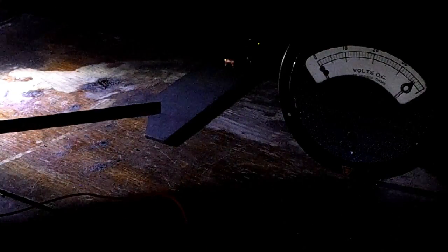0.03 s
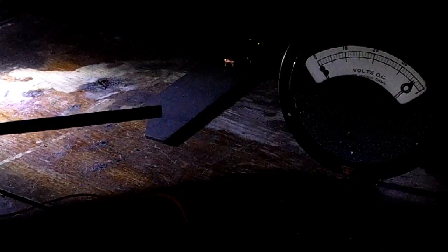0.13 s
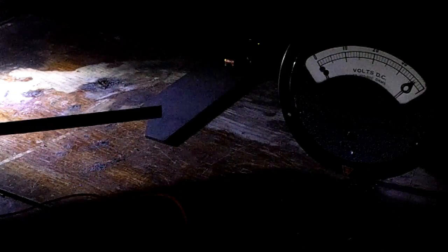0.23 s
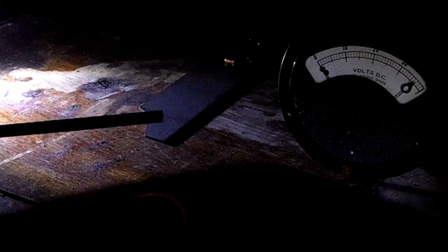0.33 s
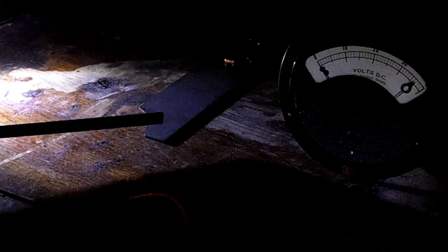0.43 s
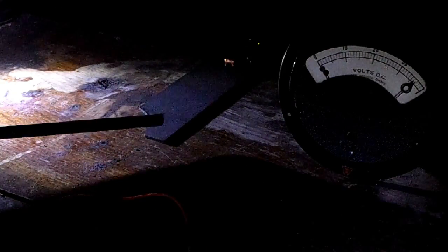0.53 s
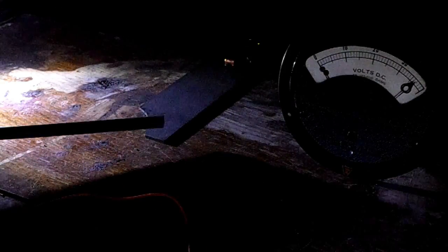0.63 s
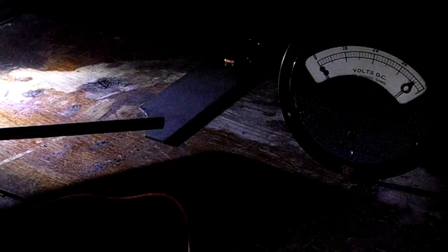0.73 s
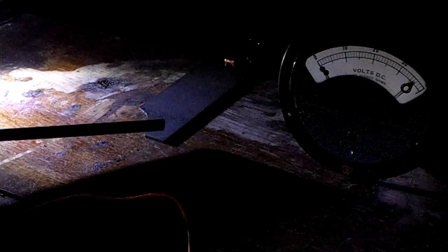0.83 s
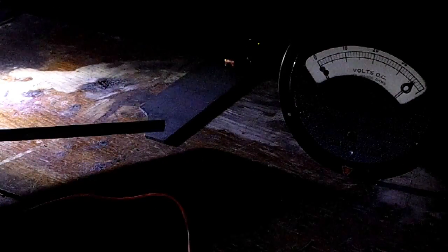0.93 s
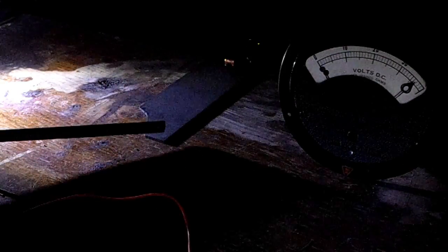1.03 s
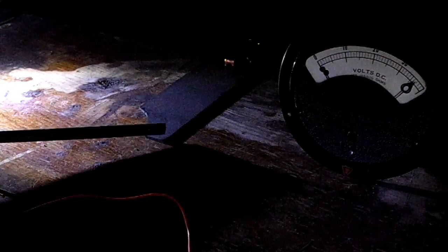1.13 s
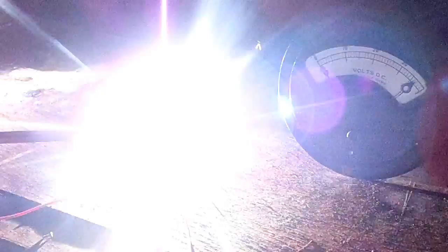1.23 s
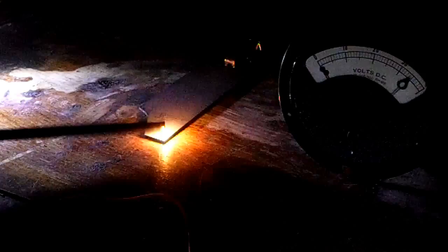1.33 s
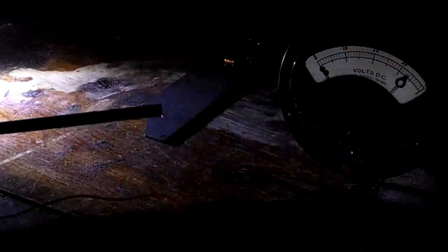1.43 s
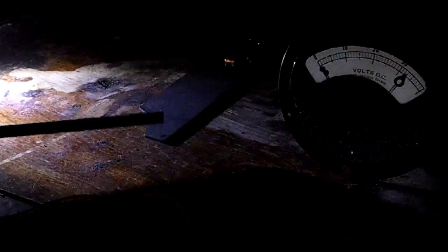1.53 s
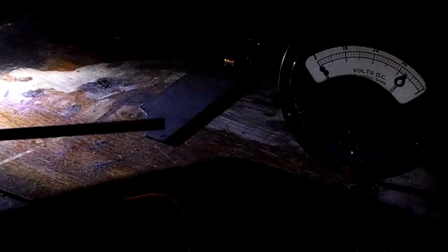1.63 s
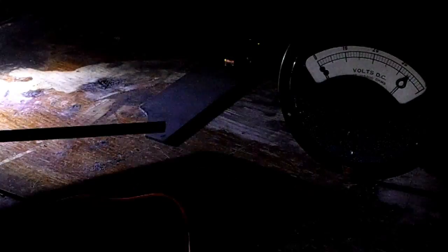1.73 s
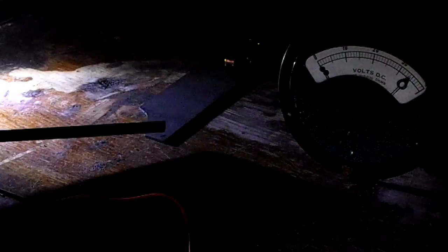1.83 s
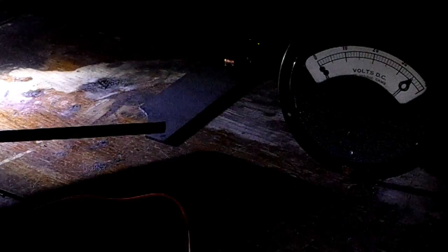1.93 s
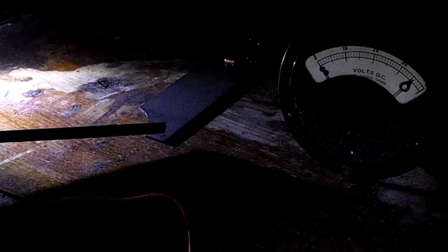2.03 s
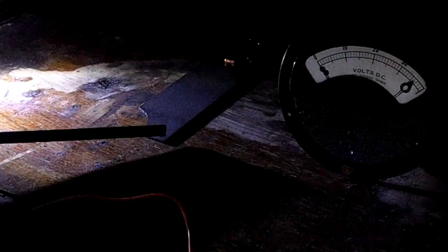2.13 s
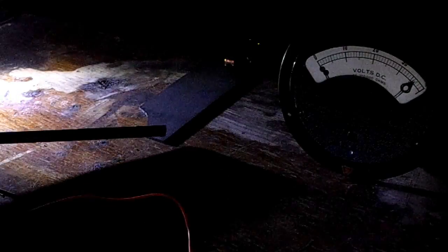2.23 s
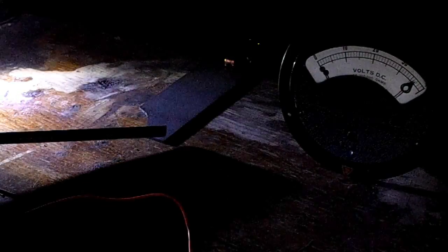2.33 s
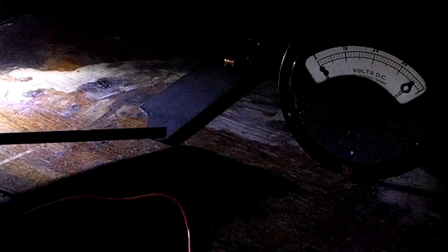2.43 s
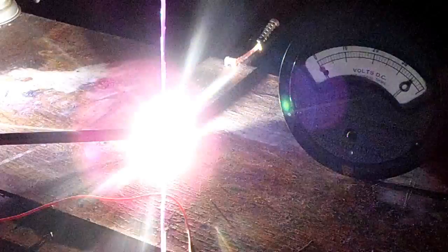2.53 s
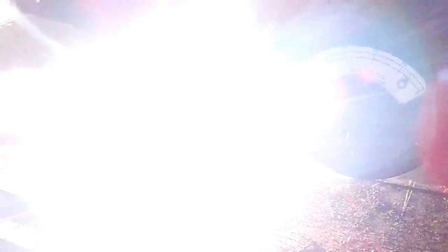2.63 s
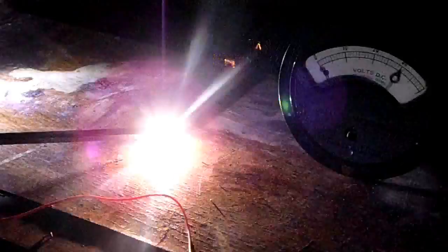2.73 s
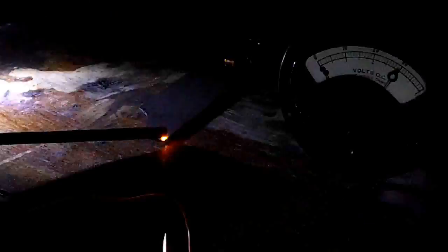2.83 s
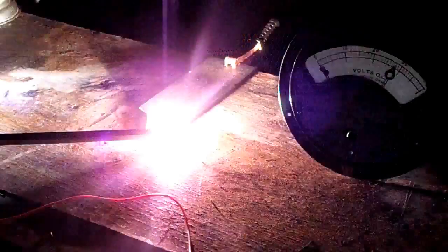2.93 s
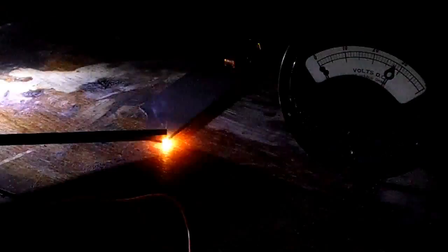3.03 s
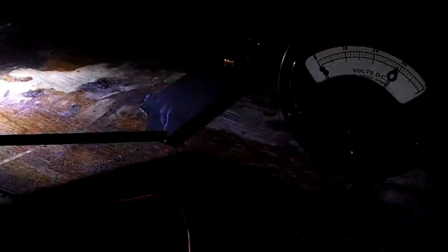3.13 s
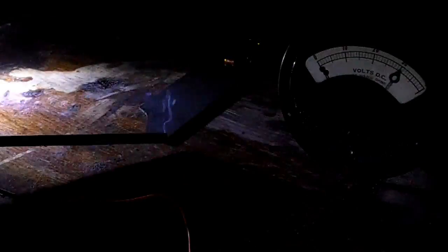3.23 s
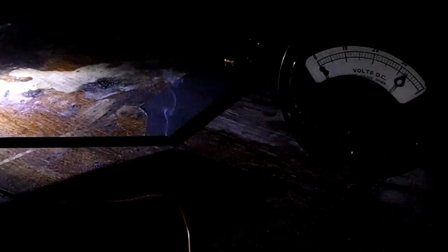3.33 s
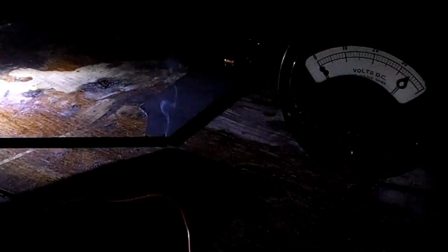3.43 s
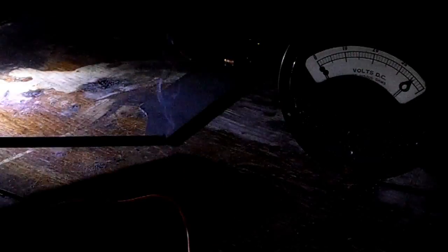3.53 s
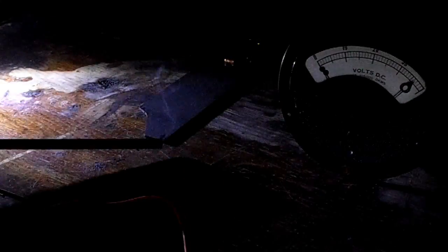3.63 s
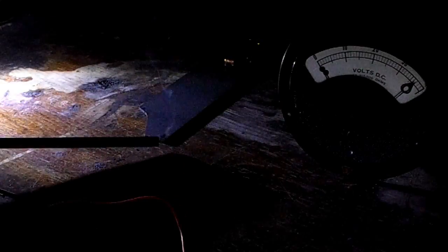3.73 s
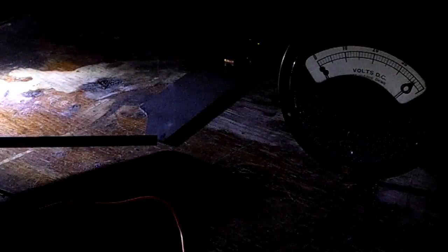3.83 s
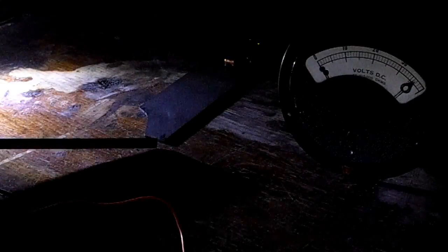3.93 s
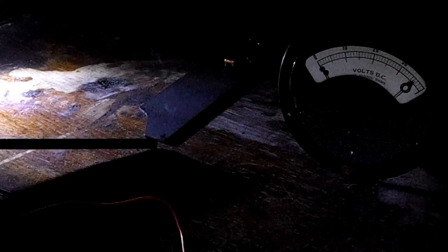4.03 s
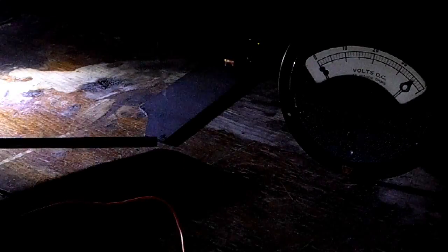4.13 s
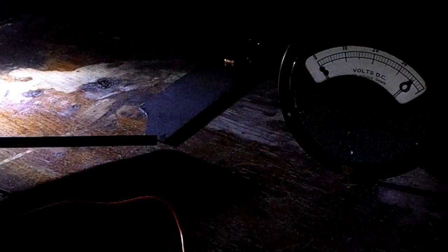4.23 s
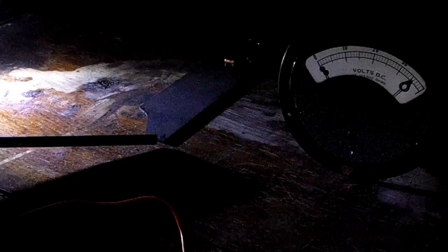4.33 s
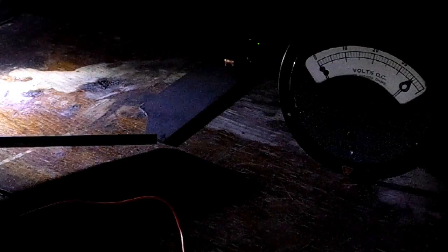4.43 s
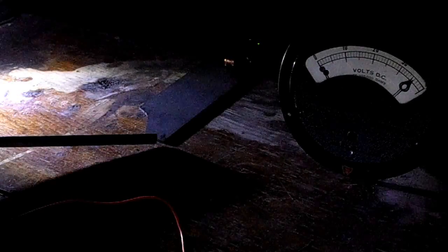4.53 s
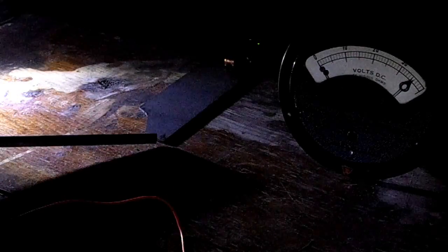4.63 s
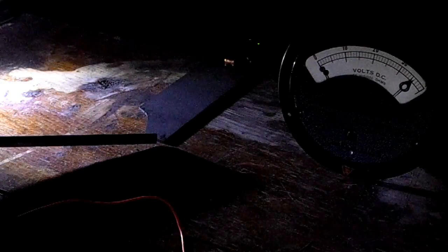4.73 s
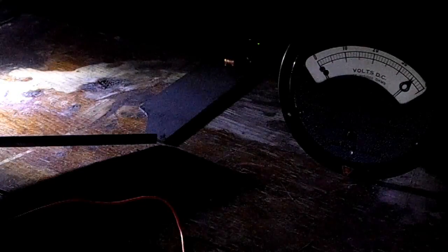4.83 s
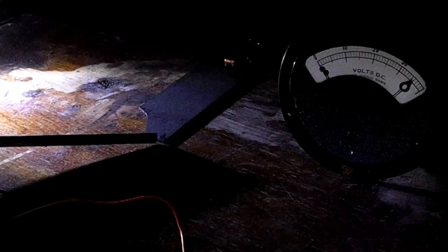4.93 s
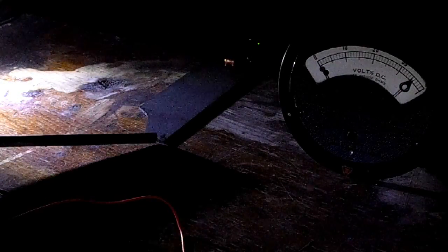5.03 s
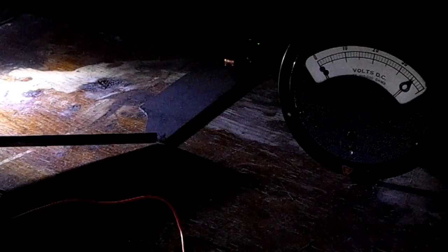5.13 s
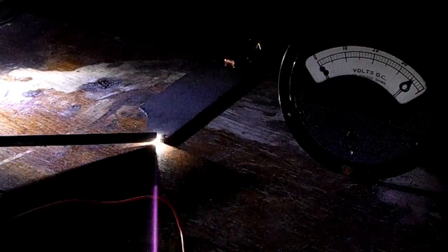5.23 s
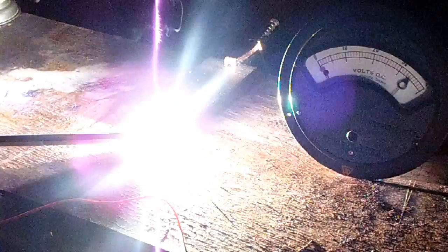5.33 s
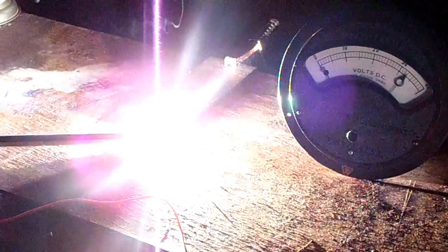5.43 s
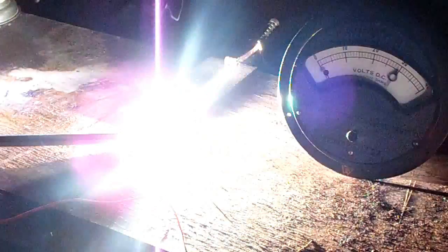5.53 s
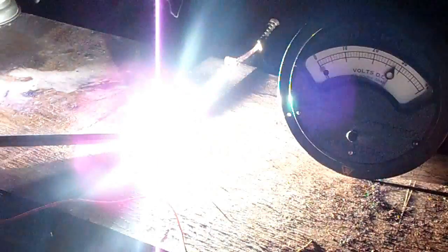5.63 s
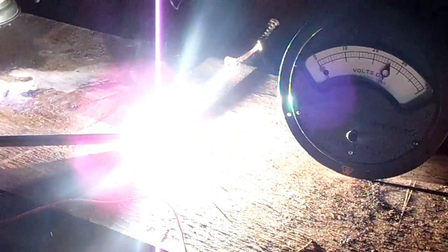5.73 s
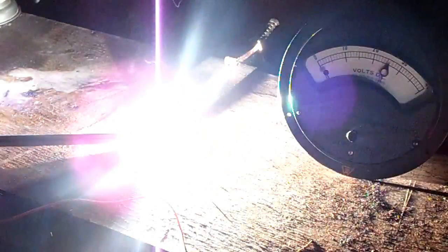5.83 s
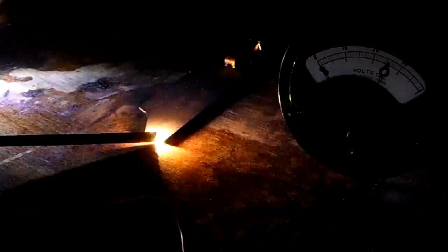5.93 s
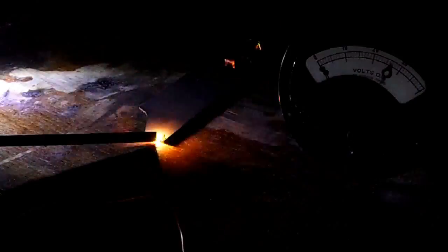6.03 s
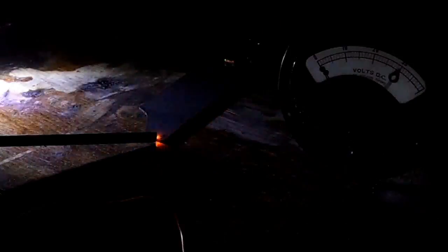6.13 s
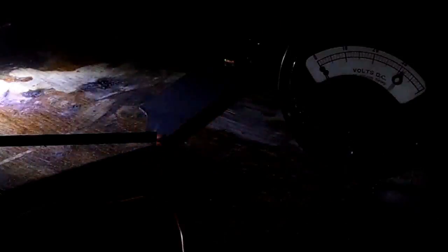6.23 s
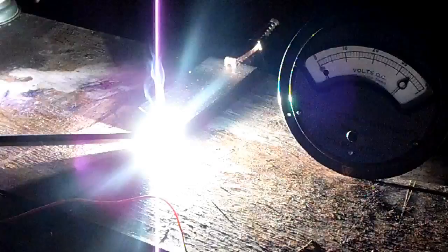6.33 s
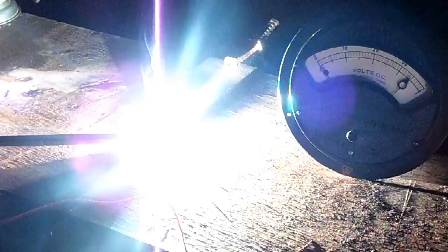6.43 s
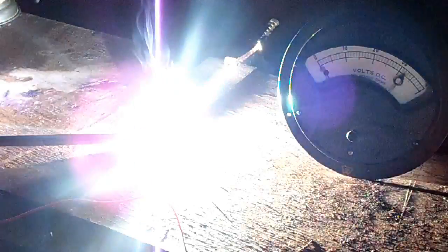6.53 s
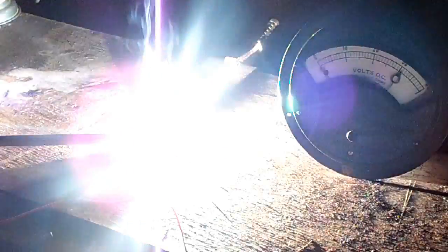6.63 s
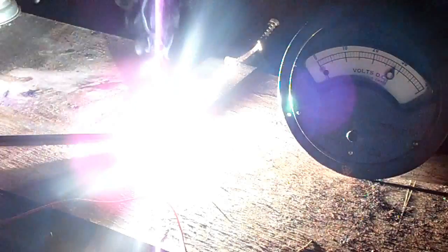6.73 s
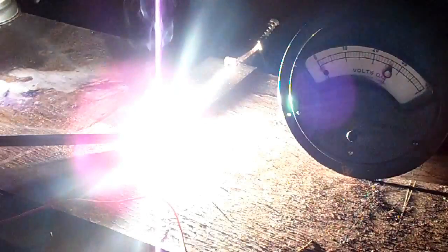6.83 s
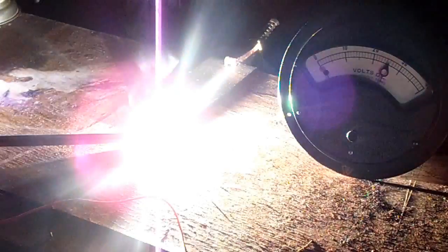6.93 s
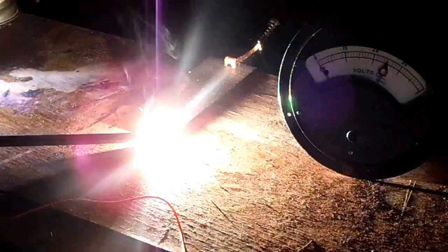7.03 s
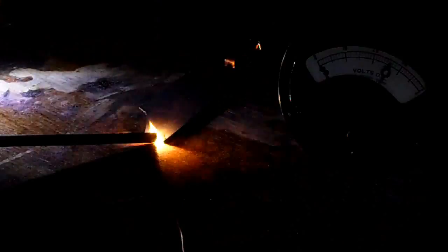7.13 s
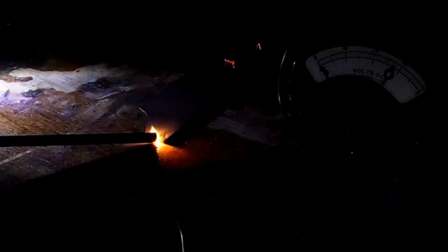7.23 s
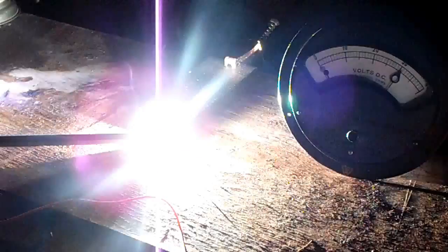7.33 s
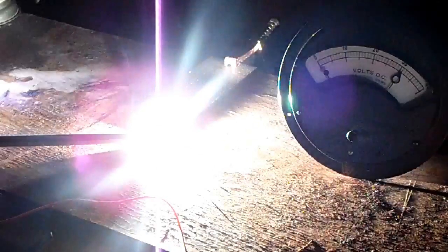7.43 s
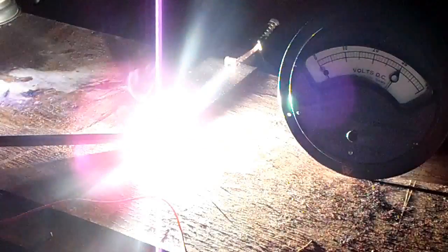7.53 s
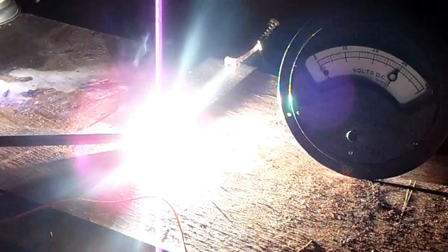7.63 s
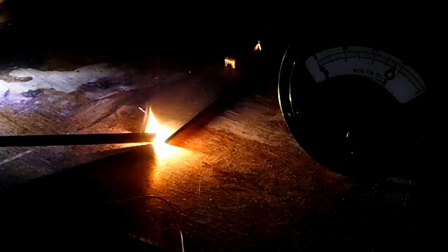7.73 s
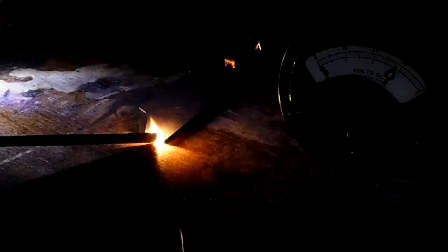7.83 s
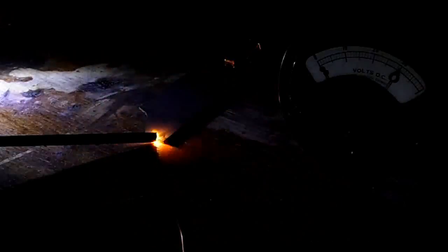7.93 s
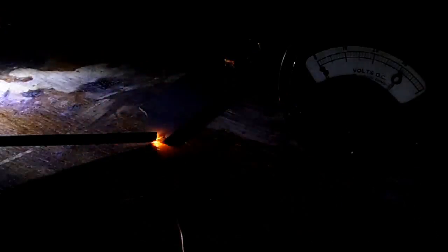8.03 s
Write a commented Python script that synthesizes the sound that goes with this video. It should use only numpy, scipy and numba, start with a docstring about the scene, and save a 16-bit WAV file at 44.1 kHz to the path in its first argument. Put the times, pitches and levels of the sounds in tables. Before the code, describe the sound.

Two carbon rods touch and part on a bench, giving sharp overloaded cracks, crackling sputter and harsh hissing, howling arcs between quiet, humming gaps.

```python
"""Two graphite electrodes on a DC supply touch and part over a workshop bench, close to one overloaded microphone.
Loose contact sputters with random sparks and sharp cracks. Drawn apart, the arc gives filtered-noise hiss
and a ragged howl, an uneven tone that sinks as the arc lengthens, until it snaps out or strikes anew.
Behind it: a short room echo, noise rumble, a far motor and a thin whine made of sine waves,
two faint ringing ticks and a faint fizz of noise."""
import sys
import numpy as np
from scipy import signal
from scipy.fft import rfft, irfft
from scipy.io import wavfile
from numba import njit

SR = 44100
rng = np.random.default_rng(int(sys.argv[2]) if len(sys.argv) > 2 else 0)


def to_wav(s):
    """Save 16-bit WAV."""
    ch = np.atleast_2d(s).T  # columns
    pcm = np.round(np.clip(ch, -1, 1) * 32767)  # PCM
    wavfile.write(sys.argv[1], SR, pcm.astype(np.int16))


N = 357077
TIME = np.arange(N) / SR   # seconds

# colour of the hiss from hot gas: pitch_hz [Hz], level_db [dB per Hz, relative]
HISS_COLOUR = [(150, -17.5), (400, -15), (1000, -16.5), (2000, -9), (3200, -4.5), (4800, 1), (7000, 3),
               (9000, 5), (12000, 0.5), (14000, 1), (16000, -10)]
STRIKE_HZ = 8995   # pitch of a newly struck arc


def from_db(db):
    """Turn decibels into gain."""
    return 10 ** (np.asarray(db) / 20)


def rms_one(x):
    """Scale to unit power."""
    return x / np.sqrt(np.mean(x ** 2) + 1e-20)


def in_time(rows):
    """Join the points of a table with straight lines, giving each column a value at every sample."""
    seconds, *columns = np.transpose(rows)
    return [np.interp(TIME, seconds, column) for column in columns]


def coloured(x, spectrum, size=8192):
    """Causal (minimum-phase) filter with the given spectrum; white input keeps its power."""
    hz, db = np.transpose(spectrum)
    grid = np.maximum(np.fft.rfftfreq(size, 1 / SR), 1)
    level_db = np.interp(np.log(grid), np.log(hz), db)
    cepstrum = irfft(np.log(from_db(level_db)))
    # folding the cepstrum forward in time puts the energy as early as possible
    fold = np.r_[1, np.full(size // 2 - 1, 2), np.zeros(size // 2)]
    response = irfft(np.exp(rfft(cepstrum * fold)))
    return signal.oaconvolve(x, response / np.linalg.norm(response))[:N]


def noise(spectrum):
    """Steady noise of about unit power."""
    return coloured(rng.standard_normal(N), spectrum)


def smooth(x, hz):
    """One-pole low-pass."""
    r = np.exp(-2 * np.pi * hz / SR)
    return signal.lfilter([1 - r], [1, -r], x + 1e-18)


def drift(hz):
    """Random wander of spread 1, mostly slower than hz."""
    return rms_one(smooth(smooth(rng.standard_normal(N), hz), hz))


def gate(start, end, rise, fall):
    """On between two times, with sloping edges."""
    return np.clip((TIME - start) / rise + .5, 0, 1) * np.clip((end - TIME) / fall + .5, 0, 1)


@njit
def swept_band(x, hz, damping, rate):
    """A resonance whose centre and width move; white input keeps an even power."""
    out, band, low = np.zeros(len(x)), 0., 0.
    for i in range(len(x)):
        g = np.tan(np.pi * hz[i] / rate)
        v = (band + g * (x[i] - low)) / (1 + g * (g + damping[i]))
        band, low = 2 * v - band, low + 2 * g * v
        out[i] = v * np.sqrt(damping[i] / g)
    return out


def rumble(level_db=-40.5):
    """Steady noise, strongest in the deep bass."""
    # colour of the rumble: pitch_hz [Hz], level_db [dB per Hz, relative]
    rumble_colour = [(12, -26.5), (20, 5.5), (86, -10), (146, -11.5), (168, -18), (182, -18.5),
                     (216, -17.5), (293, -20.5), (434, -26.5), (472, -27.5), (513, -26), (3160, -40.5),
                     (12100, -45.5), (13200, -50), (16000, -47.5)]
    return from_db(level_db) * noise(rumble_colour)


def far_motor(waver_db=0.6, overtone_db=-14.0):
    """A turning motor hums at a changing pitch, with one weaker overtone an octave up."""
    # speed and loudness of the motor: time_s [s], pitch_hz [Hz], level_db [dB]
    motor_path = [(0, 72, -54), (.6, 73, -45.5), (1.2, 78, -45), (1.8, 83, -44), (2.1, 86, -41.5),
                  (2.6, 91, -45), (3.3, 93, -47), (4.1, 95, -49.5), (4.7, 86, -48.5), (5.3, 88, -56.5),
                  (8.1, 88, -50.5)]
    hz, level_db = in_time(motor_path)
    phase = 2 * np.pi * np.cumsum(hz) / SR
    hum = np.sin(phase) + from_db(overtone_db) * np.sin(2 * phase)
    return np.sqrt(2) * from_db(level_db + waver_db * drift(1.6)) * hum


def whine(centre_hz=12800, wander_hz=25, level_db=-76):
    """A thin electronic tone is a sine wave of slightly wandering pitch."""
    hz = centre_hz + wander_hz * drift(60)
    return np.sqrt(2) * from_db(level_db) * np.sin(2 * np.pi * np.cumsum(hz) / SR)


def cooling_fizz():
    """The hot tips fizz faintly as they cool: hiss-coloured noise that swells and fades."""
    # loudness of the fizz: time_s [s], level_db [dB]
    fizz_path = [(3.1, -89), (3.3, -67), (3.7, -63.5), (3.85, -59.5), (4.0, -72.5), (4.3, -87)]
    level_db, = in_time(fizz_path)
    return from_db(level_db) * noise(HISS_COLOUR)


def ticks():
    """Each small tick, while the tips rest, rings briefly at one pitch."""
    # faint ticks: start_s [s], pitch_hz [Hz], ring_s [s to fall by 60 dB], peak_db [dB]
    tick_list = [(3.905, 2980, .06, -54), (4.168, 361, 0.032, -37)]
    out, age = np.zeros(N), np.arange(SR // 5) / SR
    for start_s, pitch_hz, ring_s, peak_db in tick_list:
        ring = from_db(peak_db - 60 * age / ring_s) * np.sin(2 * np.pi * pitch_hz * age)
        out[int(start_s * SR):][:len(age)] += ring
    return out


def room(x, near_db=-16, near_s=0.0014, count=9):
    """Quick scatter from nearby things, then a diffuse tail that dies band by band."""
    # echo of the room: pitch_hz [Hz], decay_s [s to fall by 60 dB], level_db [dB]
    echo_bands = [(298, 0.37, -19), (998, 0.27, -18.5), (2202, 0.73, -24.5), (3480, 0.46, -22.5),
                  (6000, 0.42, -16), (10200, 0.51, -24), (15060, 0.2, -14.5)]
    age = np.arange(SR) / SR
    hz, decay_s, level_db = np.transpose(echo_bands)
    edges_hz = np.geomspace(120, 17000, count + 1)
    scatter = rng.standard_normal(SR) * np.exp(-age / near_s) * (age > .0005)
    response = from_db(near_db) * scatter / np.linalg.norm(scatter)
    for low, high in zip(edges_hz, edges_hz[1:]):
        centre = np.log(low * high) / 2   # log of the band's middle pitch
        fall = from_db(-60 * age / np.interp(centre, np.log(hz), decay_s)) * (age > .004)
        band_filter = signal.butter(2, [low, high], "band", fs=SR, output="sos")
        band = signal.sosfilt(band_filter, rng.standard_normal(SR))
        gain = from_db(np.interp(centre, np.log(hz), level_db))
        response = response + gain * band * fall / np.linalg.norm(fall)
    return signal.fftconvolve(x, response)[:N]


def bench(x):
    """Near surfaces, the bench and the things on it, lift some pitches and weaken others."""
    # colour of the near surfaces: pitch_hz [Hz], width_hz [Hz], level_db [dB, boost or cut]
    surfaces = [(675, 110, -2), (903, 150, 3), (1223, 49, 4), (1614, 160, 5.5), (1920, 60, 5.5),
                (2080, 61, 4.5), (2315, 310, 4.5), (2783, 310, 6), (3350, 530, 0.5), (5326, 150, 1.5),
                (5770, 200, -1), (5870, 140, 4), (6070, 950, -3), (6770, 120, 5.5), (9500, 260, -3),
                (11600, 650, 4)]
    for pitch_hz, width_hz, level_db in surfaces:
        b, a = signal.iirpeak(pitch_hz, pitch_hz / width_hz, fs=SR)
        x = x + (from_db(level_db) - 1) * signal.lfilter(b, a, x)
    return x


def cracks(spit_s=0.00024, spit_db=-9, body_hz=700, snap_hz=5000, thin_hz=900):
    """Each crack is one sharp pressure snap and a brief spit of noise on a dull puff of heated air."""
    # loud cracks as the contact makes or breaks: start_s [s], peak_db [dB, snap], body_db [dB, puff]
    crack_list = [(1.422, -2, -28), (1.442, 10.5, -39), (1.447, 3, -40), (1.4535, 8, -23), (1.525, -5, -25),
                  (1.5367, -10, -15), (2.6992, 8.5, -26.5), (2.709, 7.5, -25), (2.874, -0.5, -10.5),
                  (2.944, -1, -20), (3.045, -7, -26), (3.057, -10, -17), (3.1555, -16.5, -14.5),
                  (5.453, -1, -22), (5.6, -6.5, -10), (5.71, -3.5, -12), (6.084, -14, -14.5),
                  (6.5248, 3, -24), (7.23, 6, -17), (7.899, 15.5, -13.5)]
    out, age = np.zeros(N), np.arange(SR // 100) / SR
    slow, fast = 2 * np.pi * body_hz * age, 2 * np.pi * snap_hz * age
    snap = (1 - fast) * np.exp(-fast)   # compression, then suction
    puff = 2 * np.sin(slow) * np.exp(-slow / 2)
    for start_s, peak_db, body_db in crack_list:
        spit = from_db(spit_db) * rng.standard_normal(len(age)) * np.exp(-age / spit_s)
        sharp = snap + spit - smooth(snap + spit, thin_hz)   # bass removed
        out[int(start_s * SR):][:len(age)] += from_db(peak_db) * sharp + from_db(body_db) * puff
    return out


def sputter(spread_db=2.0, clump_db=2.0, fizz=0.31, merge_per_s=4000, edge_s=0.0035, spit_edge_s=.004,
            low_db=-4.0, middle_db=-4.0, treble_db=0.14):
    """Sparks of uneven size jump in clumps; few make a crackle, many merge into an even spit."""
    # bursts at a loose contact: start_s [s], end_s [s], sparks_per_s [1/s],
    # level_db [dB, before the band levels], tilt_db [dB, towards the treble]
    bursts = [(1.419, 1.425, 6700, -14.5, 5.5), (1.427, 1.508, 870, -25, 7.5), (1.511, 1.538, 440, -28, -3),
              (2.685, 2.753, 930, -23, 5.5), (2.753, 2.792, 4000, -17, 6.5),
              (2.807, 2.864, 14600, -21.5, 15), (2.915, 2.947, 520, -38, -6.5),
              (3.051, 3.094, 19000, -24, 17), (3.093, 3.126, 21000, -15, 10),
              (5.441, 5.501, 470, -23.5, 2.5), (5.454, 5.462, 4600, -26.5, 15.5),
              (5.503, 5.554, 18000, -9, 7.5), (5.557, 5.565, 2800, -16, 7), (5.57, 5.581, 9000, -17.5, 10),
              (5.603, 5.65, 1250, -20.5, 2.5), (5.633, 5.703, 8900, -21.5, 11.5),
              (5.699, 5.718, 430, -20, 1.5), (5.736, 5.785, 15000, -17.5, 8.5),
              (6.52, 6.555, 9600, -37.5, 16), (6.556, 6.598, 17000, -28, 17.5),
              (7.505, 7.537, 22400, -22, 18)]
    # colours of the three bands of the sparks: pitch_hz [Hz], level_db [dB per Hz, relative]
    low_colour = [(30, 0.5), (150, -2), (400, 0.5), (900, 2), (1300, -4.5), (2500, -43)]
    middle_colour = [(700, -30.5), (1300, -1.5), (2200, 5), (3000, 6), (4500, 5), (7000, -30)]
    treble_colour = [(2500, -36.5), (4500, -3.5), (7000, -1.5), (9000, 3.5), (11500, -0.5), (14000, -3),
                     (16000, -5)]
    sizes = from_db(spread_db * np.minimum(rng.exponential(1, N), 3)) * rng.choice([-1, 1], N)
    chance, gas = rng.random(N), rng.standard_normal(N)
    clumps = clump_db * drift(200)
    bands = np.zeros((3, N))
    for start, end, per_s, level_db, tilt_db in bursts:
        merged = per_s / (per_s + merge_per_s)   # 0 separate sparks, 1 an even spit
        ramp_s = edge_s + spit_edge_s * merged ** 2   # a dense spit swells and fades more gently
        span = slice(int((start - ramp_s) * SR), int((end + ramp_s) * SR))
        edges = np.clip(np.minimum(TIME[span] - start, end - TIME[span]) / ramp_s + .5, 0, 1)
        sparks = rms_one(sizes[span] * (chance[span] < per_s / SR))
        sparks = sparks + (fizz + merged) * gas[span]
        clumped = rms_one(sparks * from_db((1 - merged) * clumps[span]))
        gains = from_db([level_db - tilt_db, level_db, level_db + tilt_db])
        bands[:, span] += np.outer(gains, edges * clumped)
    low, middle, treble = bands
    out = from_db(low_db) * coloured(low, low_colour)
    out = out + from_db(middle_db) * coloured(middle, middle_colour)
    return out + from_db(treble_db) * coloured(treble, treble_colour)


def arc_controls(fall_s=.002, pull_shape=1.5, tremor_octaves=.04, tremor_hz=12):
    """Each arc strikes high, sinks as the tips are pulled apart, then sags, bent by an unsteady hand."""
    # arcs drawn out: start_s [s], end_s [s], swell_s [s], pull_s [s], settled_hz [Hz, before sag and hand],
    # sag [octaves per s], hiss_db [dB], howl_db [dB] (both before arc() weighs them),
    # least_ragged [0-1, before the arc's length adds to it]
    arcs = [(2.877, 2.909, .012, .008, 2703, 1, -15, -24.5, .3),
            (3.132, 3.143, .008, .004, 2251, 1, -17, -14.5, 0.64),
            (5.721, 6.084, 0.0093, .072, 2357, .2, -14.5, -6.5, .3),
            (6.556, 6.798, 0.027, .16, 2250, .5, -14, -5.5, 0.46),
            (6.798, 6.948, .004, .032, 2550, 4.8, -16, -7, .12),
            (6.948, 7.228, .004, .036, 2650, 4.8, -16, -7.5, .2),
            (7.505, 7.815, 0.033, .055, 1702, .3, -15.5, -9, .22),
            (7.816, 7.9, .002, .003, 2149, 9, -18.5, -8, 0.4)]
    # the hand widens and narrows the gap: time_s [s], bend [octaves of pitch]
    hand_path = [(5.8, 0), (5.845, -.12), (5.885, .12), (5.955, 0), (5.985, .2), (6.045, -.32), (6.08, 0),
                 (7.58, 0), (7.625, -.13), (7.7, .06), (7.75, -.15), (7.8, .05)]
    hz, least, gains = np.full(N, float(STRIKE_HZ)), np.zeros(N), np.zeros((2, N))
    for start, end, swell_s, pull_s, settled_hz, sag, hiss_db, howl_db, least_ragged in arcs:
        span = slice(int((start - swell_s / 2) * SR), int((end + fall_s) * SR))
        age = np.maximum(TIME[span] - start, 0)
        closeness = np.exp(-(age / pull_s) ** pull_shape)   # 1 just struck, 0 fully drawn
        hz[span] = settled_hz * (STRIKE_HZ / settled_hz) ** closeness * 2 ** (-sag * age)
        least[span] = least_ragged
        gains += np.outer(from_db([hiss_db, howl_db]), gate(start, end, swell_s, fall_s))
    bend = in_time(hand_path)[0] + tremor_octaves * drift(tremor_hz)
    return hz * 2 ** bend, least, *gains


def howl(hz, ragged, line_width=.4, roar_width=1.0, overtone=0.064, uneven_db=-1.5, roar_share=0.78):
    """The arc root jumps in uneven cycles; when ragged, the tone dissolves into a roar around its pitch."""
    slips = smooth(rng.standard_normal(N), 1300) * np.sqrt(2 * np.pi * line_width * ragged * hz / SR)
    phase = np.cumsum(2 * np.pi * hz / SR + slips)
    cycles = np.cos(phase) + overtone * np.cos(2 * phase)
    tone = rms_one(cycles * from_db(uneven_db * drift(600)))
    roar = rms_one(swept_band(rng.standard_normal(N), hz, roar_width * (0.17 + ragged), SR))
    share = np.clip(roar_share * ragged, 0, 1)
    return np.sqrt(1 - share) * tone + np.sqrt(share) * roar


def arc(pulsing=0.072, flicker_db=-1.5, short_hz=4500, steadiest_hz=2240, hiss_trim_db=2.0, howl_trim_db=-9.5):
    """The burning arc howls, and hisses in pulses with each cycle; its length sets balance and roughness."""
    # colours of a long arc's hiss and of the howl: pitch_hz [Hz], level_db [dB per Hz, relative]
    long_hiss_colour = [(150, -22.5), (400, -29), (1000, -16), (2200, -6), (3300, 1.5), (4800, 4),
                        (7000, 2), (9000, 1.5), (12000, -0.5), (14000, 1), (16000, -4.5)]
    howl_colour = [(100, -22.5), (300, -8), (550, -0.5), (900, -1), (1500, 1.5), (2500, 1), (3300, -1),
                   (5000, 7), (9000, -11.5), (16000, -14)]
    hz, least_ragged, hiss_gain, howl_gain = arc_controls()
    octaves = np.log2(hz / steadiest_hz)   # distance from the pitch of the clearest howl

    # a short arc hisses louder, but weakly while the tips have barely parted
    hiss_gain = hiss_gain * from_db(2.5 * octaves - 3 * (hz / STRIKE_HZ) ** 4)
    # above 5000 Hz the arc is too short to howl well: 19 dB lost per octave
    howl_gain = howl_gain * from_db(-19 * np.maximum(np.log2(hz / 5000), 0))
    # shorter and longer arcs are rougher
    roughening = np.maximum(0.645 * octaves, -0.86 * octaves)
    ragged = np.clip(least_ragged + roughening, .02, .98)
    howl_gain = howl_gain * from_db(-3 * ragged)   # a ragged howl is weaker

    cycles = howl(hz, ragged)
    pulsed = rng.standard_normal(N) * np.exp(pulsing * cycles)
    gas = rms_one(pulsed * from_db(flicker_db * drift(120)))
    short = np.clip(hz / short_hz, 0, 1) ** 2   # a short arc hisses brighter
    hiss = short * coloured(gas, HISS_COLOUR) + (1 - short) * coloured(gas, long_hiss_colour)
    howling = coloured(cycles, howl_colour)
    return from_db(hiss_trim_db) * hiss_gain * hiss, from_db(howl_trim_db) * howl_gain * howling


def scene(howl_send_db=-4, spark_bench_share=0.93, room_bench_share=0.48, echo_db=1):
    """Mix sparks, hiss and howl with bench colour and room echo; the howl is sent to the echo at a lower level."""
    background = rumble() + far_motor() + whine() + cooling_fizz() + ticks()
    sparks = sputter() + cracks()
    hiss, howling = arc()
    echo = from_db(echo_db) * room(sparks + hiss + from_db(howl_send_db) * howling)
    near_bench = hiss + howling + spark_bench_share * sparks + room_bench_share * echo
    past_bench = (1 - spark_bench_share) * sparks + (1 - room_bench_share) * echo
    sound = bench(near_bench) + past_bench + background
    return np.array([sound, sound])   # one microphone feeds both channels


def record(dry, ceiling=0.98, hardness=4.8, low_cut_hz=24, cutoff_hz=15900):
    """The deepest bass is lost, the loudest peaks overload the input, the top is cut."""
    dry = signal.sosfilt(signal.butter(2, low_cut_hz, "high", fs=SR, output="sos"), dry)
    clipped = dry / (1 + np.abs(dry / ceiling) ** hardness) ** (1 / hardness)
    return signal.sosfilt(signal.ellip(12, .1, 80, cutoff_hz, fs=SR, output="sos"), clipped)


dry = scene()
out = record(dry)
to_wav(out)
```